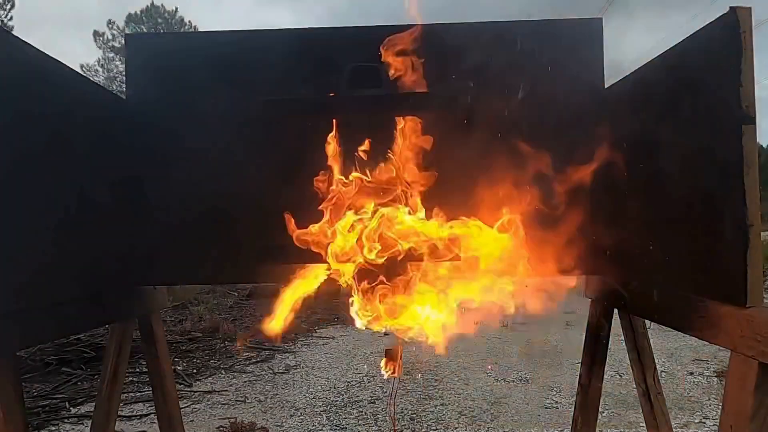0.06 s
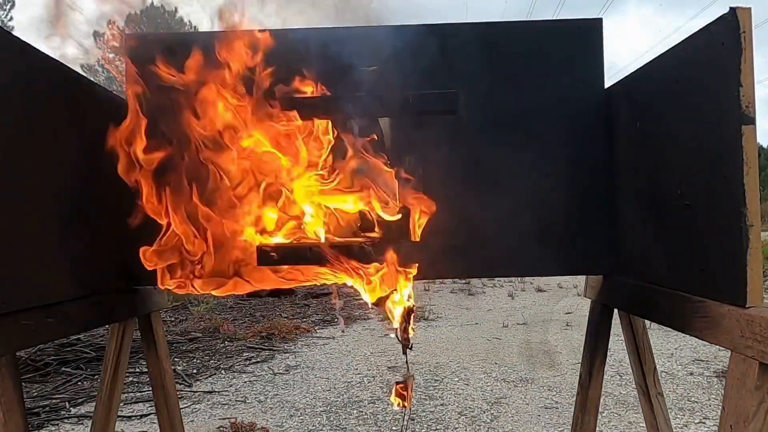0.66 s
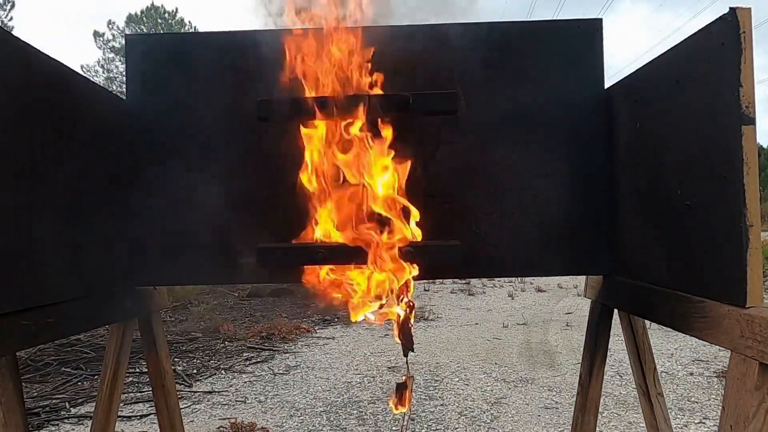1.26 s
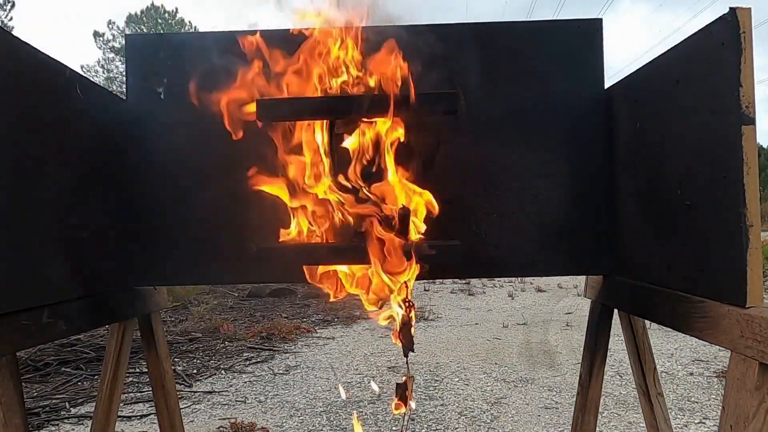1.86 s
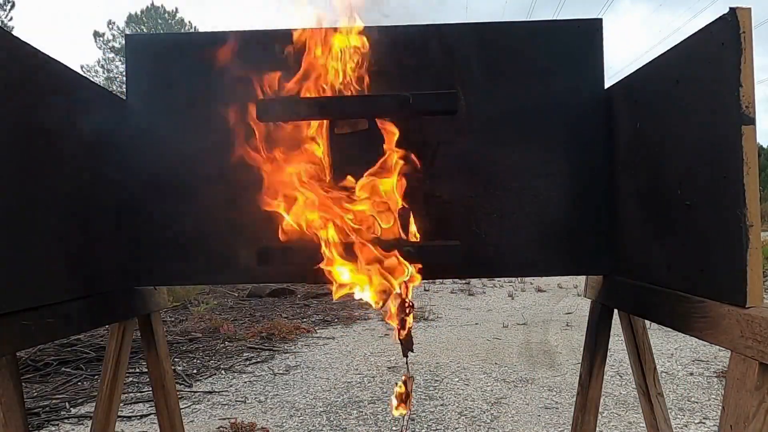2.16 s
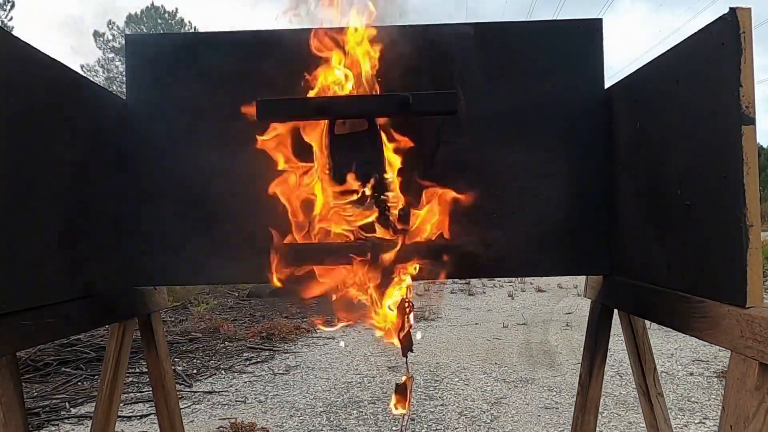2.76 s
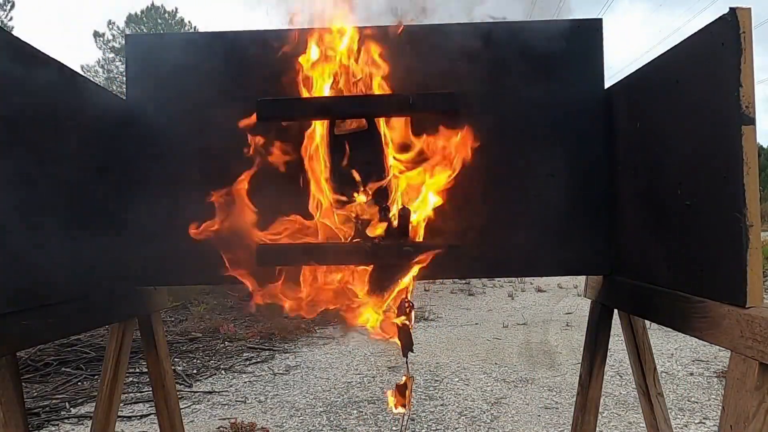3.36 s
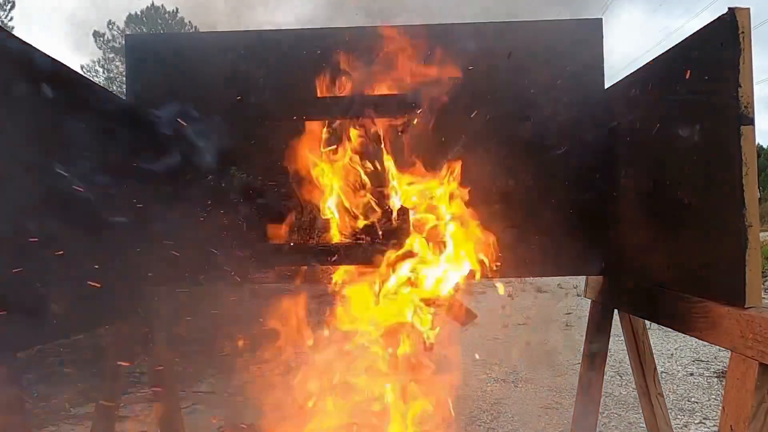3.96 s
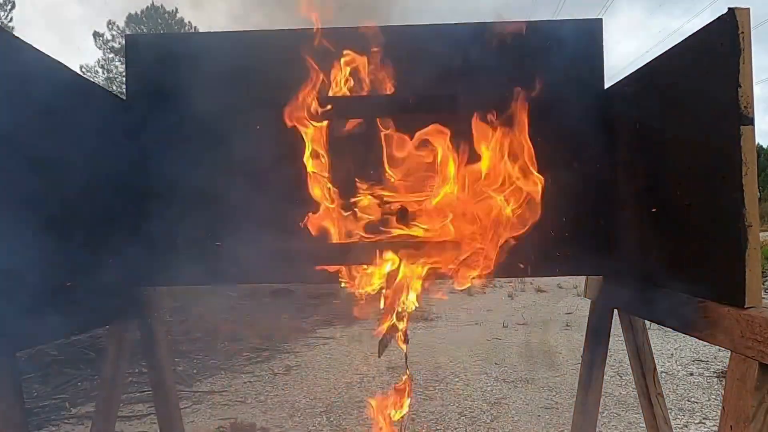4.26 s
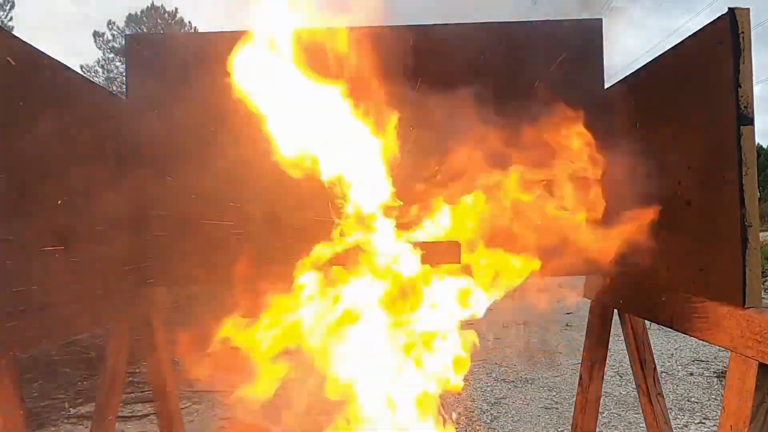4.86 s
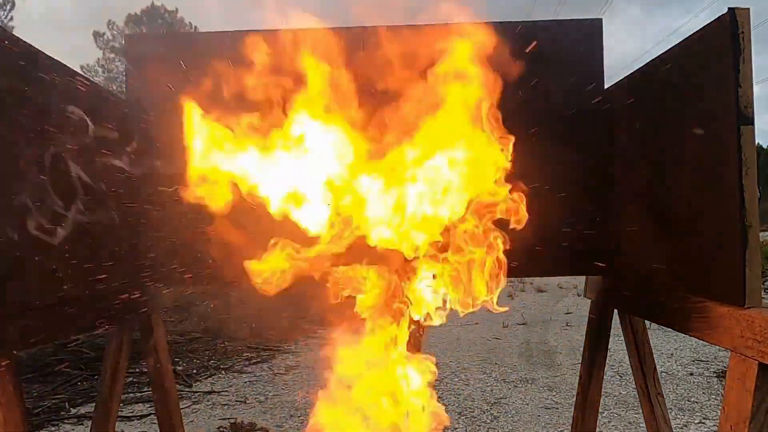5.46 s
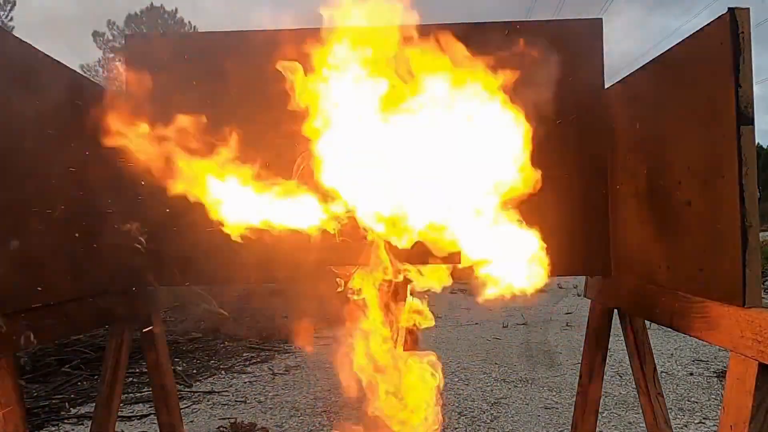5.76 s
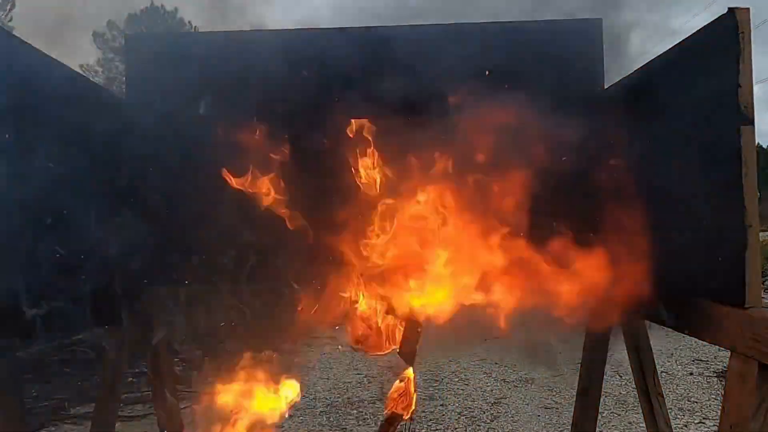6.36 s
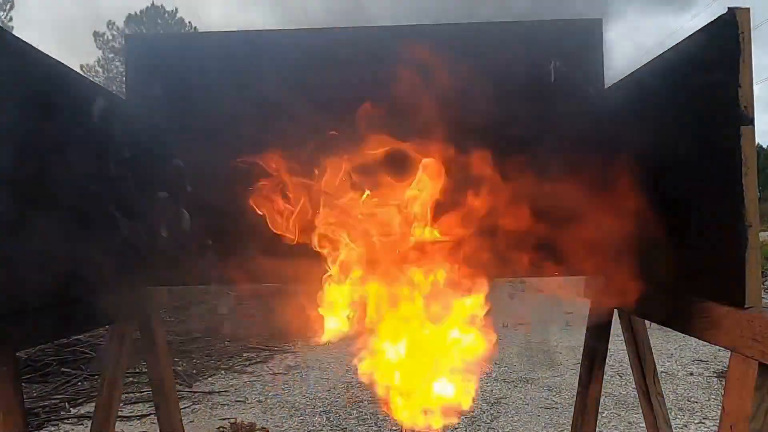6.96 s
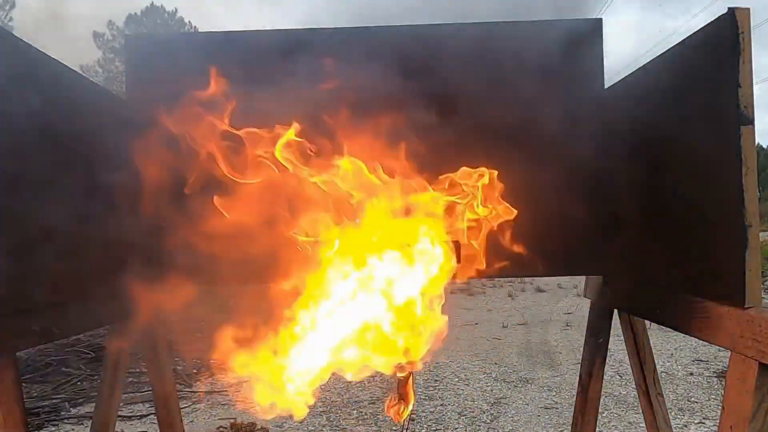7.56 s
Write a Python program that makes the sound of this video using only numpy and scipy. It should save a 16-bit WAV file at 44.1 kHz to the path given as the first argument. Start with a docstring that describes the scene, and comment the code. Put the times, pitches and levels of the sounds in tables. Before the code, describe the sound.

A burning battery hisses and flutters outdoors, then bursts with sharp pops into a roaring jet of flame and falling whistles.

```python
'''A lithium battery burns outdoors in a three-sided plywood booth.
First a jet of gas bursts out and dies away. From 1.2 s flames flutter and crackle in a light
breeze, and the cells spit through their vents. Near 3.9 s one cell blows out. From 4.5 s a long
jet of flame roars, with sharp pops from bursting cells and gas catching fire. After 6 s the jet
drops away and the vents whistle, mostly falling in pitch as their pressure changes.'''
import sys
import numpy as np
from scipy import signal
from scipy.fft import rfft, irfft, next_fast_len
from scipy.io import wavfile
from scipy.ndimage import uniform_filter1d

SR = 44100
rng = np.random.default_rng(int(sys.argv[2]) if len(sys.argv) > 2 else 0)


def master(y):
    """Save y as 16-bit WAV."""
    cut = np.clip(np.atleast_2d(y).T, -1, 1)
    pcm = np.round(cut * 32767)  # scale
    wavfile.write(sys.argv[1], SR, pcm.astype(np.int16))


N = 340011
TIME = np.arange(N) / SR


def gain_of(db):
    """Turns decibels into a number to multiply by."""
    return 10 ** (np.asarray(db) / 20)


def unit_rms(x):
    """Scales a signal so that its average strength (rms) is 1."""
    return x / np.sqrt(np.mean(x ** 2) + 1e-20)


def at_frequency(table, hz):
    """Looks up a table between its rows, with the frequencies spaced by octaves."""
    table_hz, values = np.transpose(table)
    return np.interp(np.log(hz + 1), np.log(table_hz + 1), values)


def curves(rows):
    """Joins timed rows with straight lines: one curve for each column after the time."""
    times, *columns = np.transpose(rows)
    return [np.interp(TIME, times, column) for column in columns]


def add(mix, start, sound):
    """Adds a sound into the mix at a start time in seconds."""
    part = mix[..., max(round(start * SR), 0):][..., :sound.shape[-1]]
    part += sound[..., :part.shape[-1]]


def swell(start, length, rise_s, fall_s):
    """A loudness curve that rises, holds and fades."""
    t = TIME - start
    return np.clip(t / rise_s, 0, 1) * np.exp(-np.clip((t - length) / fall_s, 0, 30))


def swells(rows, rise_s, fall_s):
    """Adds up one swell for each row of t/s, length/s, level/dB."""
    return sum(gain_of(db) * swell(start, length, rise_s, fall_s) for start, length, db in rows)


def wander(rate_hz, step=8):
    """A smooth random wobble, about as fast as the given rate."""
    coarse_time = TIME[::step]
    size = next_fast_len(len(coarse_time))
    hz = np.fft.rfftfreq(size, step / SR)
    slow = irfft(rfft(rng.standard_normal(size)) / (1 + (hz / rate_hz) ** 4), size)
    return unit_rms(np.interp(TIME, coarse_time, slow[:len(coarse_time)]))


def band(x, colour, low_hz, high_hz):
    """Shapes noise with a tone-colour table and keeps one soft-edged range of it, at rms 1."""
    size = next_fast_len(N)
    hz = np.fft.rfftfreq(size, 1 / SR) + 1
    edge_loss = np.sqrt((1 + (low_hz / hz) ** 10) * (1 + (hz / high_hz) ** 10))
    shape = gain_of(at_frequency(colour, hz)) / edge_loss
    return unit_rms(irfft(rfft(x, size) * shape, size)[..., :N])


# How alike swirling gas sounds on the left and right: f/Hz, likeness (1 = the same)
STEREO_LIKENESS = [(25, .99), (300, .992), (1000, .985), (2500, .975), (5000, .93), (9000, .85),
                   (14000, .75)]

def turbulence(patchy_db, flicker_db):
    """Stereo noise of swirling gas: swirls lift patches of frequencies and shake the whole level."""
    frames, hz = N // 128 + 5, np.fft.rfftfreq(512, 1 / SR)
    left_re, left_im, other_re, other_im, patches = rng.standard_normal((5, frames, 257))
    patches = uniform_filter1d(patches, size=9, axis=0)
    patches = unit_rms(uniform_filter1d(patches, size=8, axis=1))
    flicker = unit_rms(uniform_filter1d(rng.standard_normal(frames), size=4))[:, None]
    likeness = at_frequency(STEREO_LIKENESS, hz)
    left = left_re + 1j * left_im
    right = likeness * left + np.sqrt(1 - likeness ** 2) * (other_re + 1j * other_im)
    spectra = np.array([left, right]) * gain_of(patchy_db * patches + flicker_db * flicker)
    return unit_rms(signal.istft(spectra.swapaxes(1, 2), nperseg=512, noverlap=384)[1][:, :N])


def sparks(per_s, spread_db):
    """Tiny snaps at random moments, a few of them large, each a little to one side."""
    sizes = gain_of(spread_db * np.minimum(rng.exponential(1, N), 4))
    clicks = sizes * (rng.random(N) < per_s / SR) * rng.choice([-1, 1], N)
    sides = 1 + np.array([[.4], [-.4]]) * rng.uniform(-1, 1, N)
    t = np.arange(200) / SR
    snap = rng.standard_normal(len(t)) * np.exp(-t / 0.00017)
    return unit_rms(signal.oaconvolve(clicks * sides, snap[None], axes=1)[:, :N])


# How long the yard rings: f/Hz, time to fade by 60 dB/s
YARD_FADE = [(200, 0.14), (1500, 0.051), (5000, 0.088), (14000, 0.29)]

def yard(x):
    """Side walls, trestles and gravel scatter the sound into a short tail."""
    hz, t, spectra = signal.stft(rng.standard_normal((2, SR // 3)), SR, nperseg=256)
    fade = gain_of(-60 * t / at_frequency(YARD_FADE, hz)[:, None])
    tail = signal.istft(spectra * fade, SR, nperseg=256)[1]
    tail = np.pad(tail, ((0, 0), (100, 0)))
    return signal.oaconvolve(x, tail / np.linalg.norm(tail[0]), axes=1)[:, :N]


def back_wall(x, echo=0.042, delay_s=.0034):
    """The plywood right behind the battery sends back one quick echo."""
    delayed = np.pad(x, ((0, 0), (round(delay_s * SR), 0)))[:, :N]
    return (x + echo * delayed) / np.sqrt(1 + echo ** 2)


# How the two microphones differ: f/Hz, left minus right level/dB
MIC_BALANCE = [(30, -0.3), (3000, -0.4), (7000, 0), (10500, -1.5), (12500, -7), (16000, -2.5)]

def microphones(x, left_lag_s=6e-6):
    """The left microphone is shaded from the highest tones and hears the fire a moment later."""
    size = next_fast_len(N)
    hz = np.fft.rfftfreq(size, 1 / SR)
    shade = gain_of(at_frequency(MIC_BALANCE, hz) / 2)
    lag = np.exp(-2j * np.pi * hz * left_lag_s)
    return irfft(rfft(x, size) * np.array([shade * lag, 1 / shade]), size)[:, :N]


# How wide the sound is and how it leans; almost mono from 5.1 to 5.9 s, during the long jet:
# t/s, width/dB, right minus left level/dB
STEREO_IMAGE = [(.8, -15, -0.6), (1.05, -4, 1.5), (1.22, 5.5, 1), (3.8, 3.5, 1), (3.9, 11, 0.1),
                (4.55, 7, 0.9), (5.1, -41, -1), (5.85, -51, 0), (6.1, -22, 0.45), (7.3, -3.5, 0.1)]

def stereo_spread(x, top_hz=8100):
    """Widens or narrows the sound below top_hz and leans all of it a little to one side."""
    width_db, lean_db = curves(STEREO_IMAGE)
    side = signal.filtfilt(*signal.butter(2, top_hz, fs=SR), x - x.mean(0))
    return (x + side * (gain_of(width_db) - 1)) * gain_of(np.array([-lean_db, lean_db]) / 2)


def sizzle():
    """Hot casings sizzle faintly all over the booth."""
    fine_noise = rng.standard_normal((2, N)) + gain_of(-13) * sparks(per_s=40, spread_db=4.5)
    return gain_of(-72.5) * band(fine_noise, JET_TONE, 1350, 9000)


GUST_RISE_S, GUST_FALL_S = 0.024, 0.037
# Gusts of wind: t/s, length/s, level/dB
WIND_GUSTS = [(1.16, 0.032, -30), (1.87, 0.13, -32.5), (2.38, 0.25, -38.5), (2.7, 0.59, -44),
              (2.87, .06, -30), (3.62, 0.065, -23.5), (3.77, 0.11, -25), (7.63, .08, -29)]

def breeze(calm_db=-64.5, left_shelter_db=-8):
    """Wind thumps each microphone separately with a low rumble; the left one is sheltered."""
    rumble = band(rng.standard_normal((2, N)), FLAME_TONE, 18, 87) * gain_of(0.84 * wander(16))
    strength = gain_of(calm_db) + swells(WIND_GUSTS, GUST_RISE_S, GUST_FALL_S)
    return rumble * strength * gain_of([[left_shelter_db], [0]])


# Vents whistle as their pressure changes: t/s, length/s, start f/Hz, end f/Hz,
# upward bend (share of the pitch), base tone level/dB, octave level/dB, hoarseness (capped at 1)
VENT_WHISTLES = [(4.983, 0.036, 2150, 1850, 0.0073, -35, -24, 1.13),
                 (5.037, .14, 1515, 1436, -.02, -52, -28.5, 1),
                 (6.002, 0.11, 2830, 2480, -0.079, -62, -32.5, .9),
                 (6.105, 0.04, 2650, 2450, .005, -50, -29.5, 1),
                 (6.123, .115, 1710, 1398, -.06, -49, -25, 1.1),
                 (6.21, 0.14, 2070, 1680, .05, -34.5, -28, 0.77),
                 (6.254, 0.21, 1668, 1495, .02, -48, -29, 0.9),
                 (6.281, .075, 1950, 1663, .005, -32, -46, .6),
                 (6.396, .15, 1705, 1318, .01, -36.5, -31, 0.97),
                 (6.467, 0.073, 1507, 1274, .02, -30.5, -52, 0.27),
                 (6.525, .11, 1250, 1010, -.02, -34.5, -43, 0.3),
                 (6.726, .055, 1450, 1770, .005, -54, -41.5, .7),
                 (6.763, 0.12, 1854, 1890, -.005, -38.5, -39, 0.26),
                 (6.859, 0.17, 1513, 1460, .005, -52, -47, 0.66),
                 (7.18, 0.27, 2010, 1910, 0.014, -43.5, -47.5, 1.1)]

def whistles(fuzz_hz=150, waver=0.0178, top_hz=6800):
    """Gas sings on a vent's edge: a clean tone in smooth flow, a sputtering screech when hoarse."""
    fuzz_rates = fuzz_hz * np.sqrt([1, 2, 3, 4])
    fuzz = [(wander(rate) + 1j * wander(rate)) / np.sqrt(2) for rate in fuzz_rates]
    rasp = band(turbulence(patchy_db=-2, flicker_db=1.5)[0], JET_TONE, 2300, 6900)
    wobble, sputter, out = wander(56.3), wander(33), np.zeros(N)
    for start, length, from_hz, to_hz, bend, base_db, octave_db, hoarse in VENT_WHISTLES:
        span = np.arange(round(start * SR), min(round((start + length) * SR), N))
        progress, hoarse = np.linspace(0, 1, len(span)), min(hoarse, 1)
        hz = from_hz * (to_hz / from_hz) ** progress * (1 + bend * np.sin(np.pi * progress))
        hz *= 1 + waver * (.5 + 2 * hoarse) * wobble[span]
        phase = 2 * np.pi * np.cumsum(hz) / SR
        arch = abs(np.sin(np.pi * progress ** 0.65)) ** 0.73  # swells early, fades slowly
        sound = gain_of(octave_db - 5) * hoarse * rasp[span]
        for harmonic, db in enumerate([base_db, octave_db, octave_db - 14, octave_db - 14], 1):
            roughness = np.sqrt(1 - hoarse ** 2) + hoarse * fuzz[harmonic - 1][span]
            sound += gain_of(db) * np.sqrt(2) * (roughness * np.exp(1j * harmonic * phase)).real
        add(out, start, arch * gain_of(2.9 * hoarse * sputter[span]) * sound)
    return signal.sosfilt(signal.butter(6, top_hz, fs=SR, output="sos"), out)


# Tone colour of a spit: f/Hz, level/dB
SPIT_TONE = [(300, -14), (900, -0.5), (2000, -1.5), (4000, 0), (7000, -7), (10000, -11.5), (13000, -16),
             (16000, -19.5)]
# Short spits from a vent: t/s, length/s, level/dB, f/Hz at which the hole rings
VENT_SPITS = [(1.820, 0.023, -30, 3520), (1.893, 0.023, -31, 3400), (1.944, 0.0082, -31, 4200),
              (1.967, .008, -28.5, 3200), (1.977, 0.0096, -37, 3200), (1.991, 0.006, -30, 3000),
              (2.005, 0.012, -28.5, 2600), (2.02, 0.016, -32, 2760), (2.062, 0.005, -33, 3800),
              (2.162, 0.0032, -34.5, 3620), (2.179, 0.0036, -34, 4320), (2.246, 0.0073, -44, 5600),
              (2.260, 0.004, -32, 5330), (2.382, 0.023, -44.5, 3600), (2.399, 0.012, -37, 4000),
              (2.416, 0.0044, -34.5, 3900), (2.479, 0.015, -41.5, 3200), (2.497, 0.016, -35.5, 1190),
              (3.855, 0.0043, -22, 6130), (4.987, 0.014, -25.5, 3700), (5.846, 0.0079, -15.5, 3980),
              (6.023, 0.0037, -41, 3200)]

def spits(rise_s=.0015, fall_s=.002, ring_db=-3, rasp_db=3.5):
    """A vent opens for a moment: a rasping burst of hiss, coloured by the size of the hole."""
    out, t = np.zeros((2, N)), np.arange(3000) / SR
    hiss = band(turbulence(patchy_db=-2, flicker_db=2), SPIT_TONE, 400, 16000)
    hiss *= gain_of(rasp_db * wander(640))  # boiling liquid chops the flow
    for start, length, db, hz in VENT_SPITS:
        puff = hiss[:, round(start * SR):][:, :len(t)]
        ring = signal.lfilter(*signal.iirpeak(hz, Q=1.8, fs=SR), puff)
        opening = np.minimum(t / rise_s, 1) * np.exp(-np.maximum(t - length, 0) / fall_s)
        add(out, start, gain_of(db) * opening * unit_rms(puff + gain_of(ring_db) * unit_rms(ring)))
    return out


# Cells burst and gas catches fire: t/s, level/dB, f/Hz, time for the ring to fade by 60 dB/s
CELL_POPS = [(.565, -17, 10000, .004), (.5686, -11, 1100, .006), (.5702, -9, 480, .006),
             (1.1586, -18, 850, .011), (1.5146, -33, 1500, .006), (2.9084, -35, 2500, .006),
             (3.9135, -3, 280, .012), (3.9615, -1, 1200, .014), (3.9640, -5, 700, .007),
             (4.4190, -30, 2200, .008), (4.4792, -16, 2000, .016), (4.7368, -3, 260, .015),
             (4.9282, -3, 300, .05), (5.4822, -7, 1300, .014), (5.9985, 4, 900, .012),
             (6.0472, -13, 2400, .009), (7.0424, -20, 1400, .014)]

def pops(grit=.3, lowest_hz=130):
    """Each pop is a shock wave, a few slowing swings of air pressure and a spray of grit."""
    out, t = np.zeros((2, N)), np.arange(3000) / SR
    for start, db, hz, ring_s in CELL_POPS:
        cycles = t * hz
        shock = (1 - cycles / .1) * np.exp(-cycles / .1)
        slowing = .7 + .7 * np.exp(-cycles / 2.5)
        swing = np.sin(2 * np.pi * np.cumsum(hz * slowing) / SR) * gain_of(-60 * t / ring_s)
        muffle = signal.butter(4, min(3 * hz, 6000), fs=SR)
        spray = unit_rms(signal.lfilter(*muffle, rng.standard_normal(len(t))))
        spray *= gain_of(-35 * t / ring_s)
        add(out, start, gain_of(db) * (.25 * shock + .9 * swing + grit * spray))
    bass_cut = signal.butter(2, lowest_hz, "high", fs=SR)  # the pops carry no deep bass
    return signal.lfilter(*bass_cut, out)


# Tone colour of the first jet of gas: f/Hz, level/dB
GAS_TONE = [(20, -26), (60, -24), (130, -10), (280, -1.5), (560, 4), (900, 2), (1400, -2.5), (3000, 1.5),
            (4200, -4.5), (6000, -15.5), (8300, -27.5), (10500, -25), (14000, -28.5), (16000, -26.5)]

def gas_jet(hold_s=0.5, fade_db_per_s=13.5):
    """Gas bursts out, then rushes and crackles as it loses pressure; its draught brushes past."""
    burst = swell(0, length=0.12, rise_s=0.0015, fall_s=0.018)
    rush = gain_of(-40.5 - fade_db_per_s * np.maximum(TIME - hold_s, 0))
    gas = turbulence(patchy_db=1.6, flicker_db=1.95) + gain_of(-13) * sparks(per_s=200, spread_db=5)
    roar = np.hypot(gain_of(-16 - 128 * TIME), gain_of(1.5) * rush)  # hypot adds by power
    hiss = np.hypot(gain_of(-25.5) * burst, rush)
    fizz = np.hypot(gain_of(-26) * burst, gain_of(-8.5 - 3.8 * TIME) * rush)
    draught = gain_of(-47.5) + gain_of(-41) * swell(.96, 0.12, GUST_RISE_S, GUST_FALL_S)
    return (roar * band(gas, GAS_TONE, 15, 1540)
            + hiss * band(gas, GAS_TONE, 2060, 4300)
            + fizz * band(gas, GAS_TONE, 7400, 23000)
            + draught * band(rng.standard_normal((2, N)), GAS_TONE, 13.7, 446))


# The fire before, during and after the long jet: t/s, gas flow level/dB, burning level/dB
LOW_FIRE = [(1.19, -60.5, -44), (1.72, -57, -49.5), (1.95, -56.5, -43), (2.6, -59.5, -45), (2.95, -58, -39),
            (3.12, -59.5, -45), (3.4, -54, -44.5), (3.64, -56, -47), (3.83, -49.5, -44), (4.0, -52.5, -41),
            (4.1, -60.5, -52), (4.2, -54, -55), (4.46, -54, -49)]
LONG_JET = [(4.52, -41, -37.5), (4.55, -42, -28.5), (4.61, -28, -16), (4.8, -23, -16.5),
            (4.905, -23.5, -25.5), (4.95, -28.5, -21), (5.07, -28.5, -16.5), (5.21, -31.5, -18.5),
            (5.3, -29.5, -25), (5.44, -29, -23), (5.52, -35, -28), (5.72, -30.5, -25), (5.83, -32, -25.5),
            (6.01, -26.5, -26)]
LATE_FIRE = [(6.05, -52, -45.5), (6.2, -34.5, -41.5), (6.46, -42.5, -38.5), (6.7, -46, -34.5),
             (6.92, -44.5, -30.5), (6.98, -43.5, -42), (7.13, -44.5, -33.5), (7.31, -41.5, -27.5),
             (7.45, -47, -31), (7.7, -44, -32)]

def fire_strength():
    """How hard the gas flows and how hard it burns, as two loudness curves."""
    return gain_of(curves(LOW_FIRE + LONG_JET + LATE_FIRE))


# Flare-ups: t/s, length/s, flutter level/dB, thump level/dB, whoosh level/dB
FLARE_UPS = [(3.859, 0.042, -26.5, -12, -50), (3.904, 0.065, -18, -24, -23),
             (4.586, 0.036, -15.5, -17.5, -33), (4.632, 0.063, -27, -26, -18), (4.93, 0.041, -19, -26, -22),
             (5.035, 0.03, -18, -37, -21.5), (5.876, 0.13, -17, -20, -29), (6.89, 0.035, -30.5, -27.5, -41)]

def flare_ups(rise_s=0.0066, fall_s=0.006, thump_fall_s=0.035):
    """Escaped gas catches fire: loudness curves for its flutter, deep thump and whoosh."""
    starts, lengths, flutter_db, thump_db, whoosh_db = np.transpose(FLARE_UPS)
    return (swells(zip(starts, lengths, flutter_db), rise_s, fall_s),
            swells(zip(starts, lengths, thump_db), rise_s, thump_fall_s),
            swells(zip(starts, lengths, whoosh_db), rise_s, fall_s))


# Tone colour of the flames, also used for the breeze: f/Hz, level/dB
FLAME_TONE = [(12, -32), (20, -12), (38, 1.5), (75, 0.5), (158, -1), (187, -1.5), (284, -1.5), (348, -3),
              (527, -18.5), (675, -13), (800, -64), (1040, -46), (1760, -120)]

def flames(burn, flutter, thump, level_off_db=-26.5):
    """Uneven burning makes the hot gas heave and flutter; the deep heave levels off in a fast jet."""
    hot_gas = turbulence(patchy_db=-0.5, flicker_db=2.5)
    heave = gain_of(0.5) * burn / np.hypot(1, burn / gain_of(level_off_db))
    return (np.hypot(heave, thump) * band(hot_gas, FLAME_TONE, 17, 112)
            + np.hypot(burn, flutter) * band(hot_gas, FLAME_TONE, 153.5, 488))


# Tone colour of the burning jet, also used for the sizzle and the whistles' rasp: f/Hz, level/dB
JET_TONE = [(210, -23), (350, 5.5), (566, -15), (685, -13.5), (990, -14.5), (1120, -13), (1600, -15.5),
            (2750, -16), (4240, -18.5), (6330, -25), (8170, -33), (9140, -29), (11300, -38), (12600, -34),
            (16000, -44.5)]
# A cell tears open: t/s, length/s, hiss level/dB, growth/dB, fizz compared with hiss/dB
CELL_TEARS = [(3.836, 0.027, -32, 14.5, -5), (3.87, 0.035, -23, 2.5, -5), (3.899, 0.069, -29, 4.5, -12),
              (4.535, 0.069, -31.5, 0.5, -6.5), (5.543, 0.055, -28, -5, -18), (5.915, 0.077, -29, 7, -23),
              (6.09, 0.029, -42, 7, 0)]

def burning_jet(flow, burn, whoosh, full_flow_db=-30):
    """Large swirls roar, small ones hiss and fizz; sparks stand out while the flow is weak."""
    hiss = flow
    fizz = gain_of(full_flow_db - 15.5) * (flow / gain_of(full_flow_db)) ** 1.13  # outgrows the hiss
    for start, length, db, growth_db, fizz_db in CELL_TEARS:
        progress = np.clip((TIME - start) / length, 0, 1)
        tear = swell(start, length, rise_s=.006, fall_s=0.0052) * gain_of(db + growth_db * progress)
        hiss = np.hypot(hiss, tear)
        fizz = np.hypot(fizz, gain_of(fizz_db) * tear)
    roar = np.hypot(gain_of(-9) * np.hypot(hiss, burn), whoosh)
    hiss_db = np.maximum(20 * np.log10(hiss), -58)
    crackle = gain_of(-16 - .2 * (hiss_db + 33))
    snaps = sparks(per_s=110, spread_db=4.8)
    gas = (turbulence(patchy_db=2.5, flicker_db=1.25) + crackle * snaps) / np.hypot(1, crackle)
    return (roar * band(gas, JET_TONE, 449, 1110)
            + hiss * band(gas, JET_TONE, 1400, 6980)
            + fizz * band(gas, JET_TONE, 6950, 17000))


def scene(alight_s=1.172):
    """The gas jet gives way suddenly to the fire; spits, pops and whistles sound on top."""
    alight = np.clip((TIME - alight_s) / .004 + .5, 0, 1)
    flow, burn = fire_strength()
    flutter, thump, whoosh = flare_ups()
    spit, pop, whistle = spits(), pops(), whistles()
    gas = gas_jet()
    fire = burning_jet(flow, burn, whoosh) + flames(burn, flutter, thump)
    direct = (1 - alight) * gas + alight * fire + spit + pop + whistle
    scatter = yard(gain_of(-8) * spit + gain_of(-34) * whistle)
    battery = stereo_spread(microphones(back_wall(direct) + scatter))
    return battery + alight * (breeze() + sizzle())


def record(dry, top_hz=15950):
    """Rounds off the loudest peaks, then removes the very highest tones."""
    rounded = dry / (1 + dry ** 6) ** (1 / 6)
    treble_cut = signal.firwin(511, top_hz, window=("kaiser", 9), fs=SR)
    return signal.oaconvolve(rounded, treble_cut[None], "same")


dry = scene()
out = record(dry)
master(out)
```